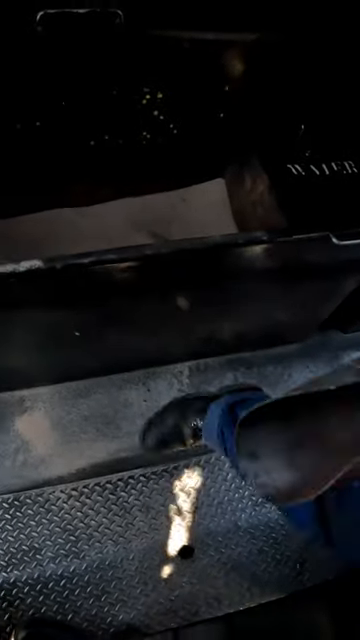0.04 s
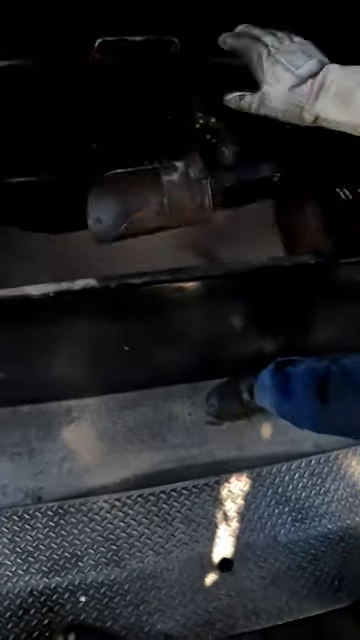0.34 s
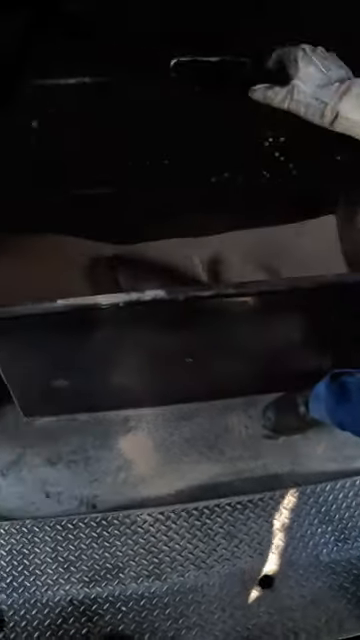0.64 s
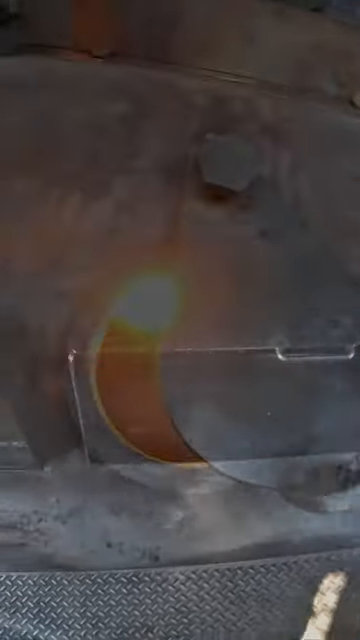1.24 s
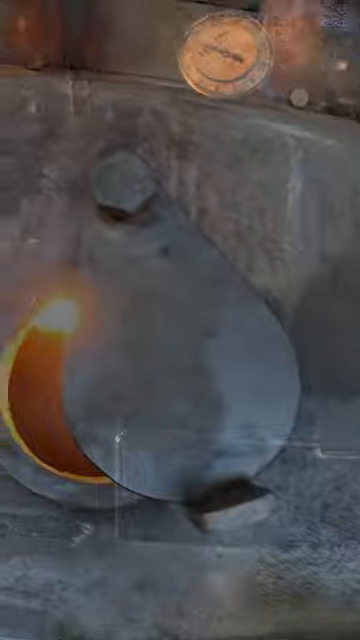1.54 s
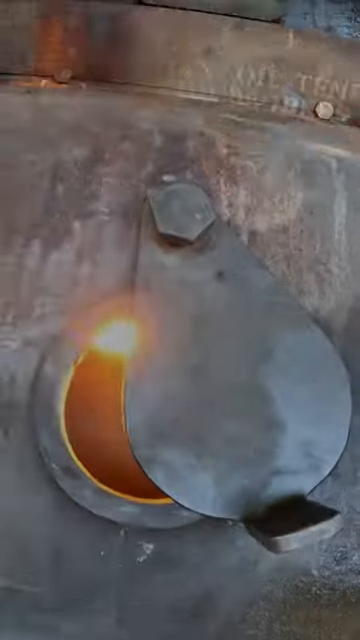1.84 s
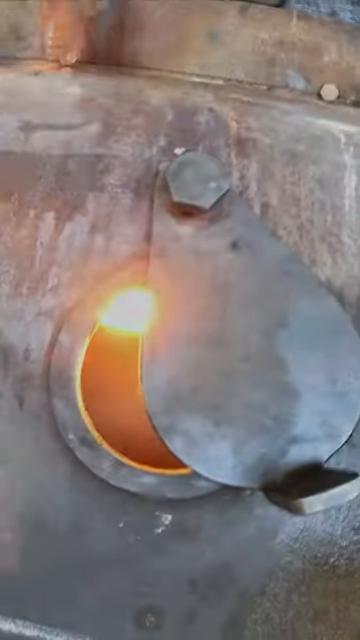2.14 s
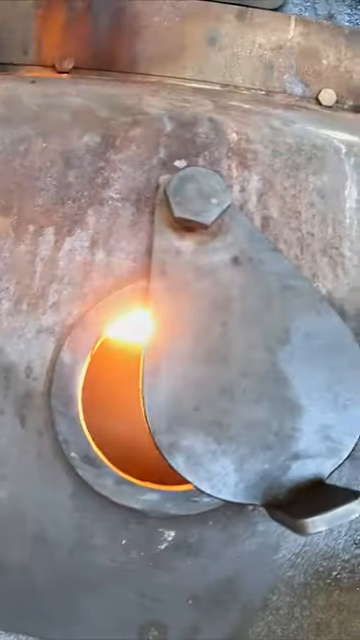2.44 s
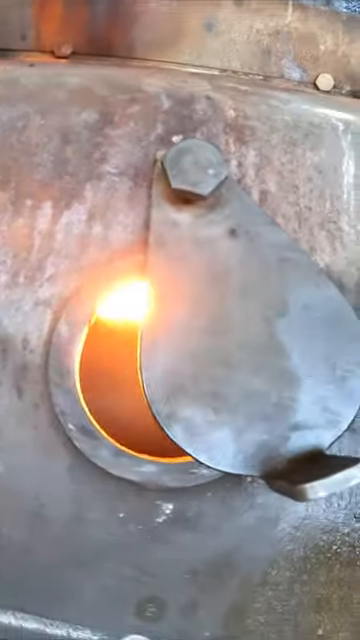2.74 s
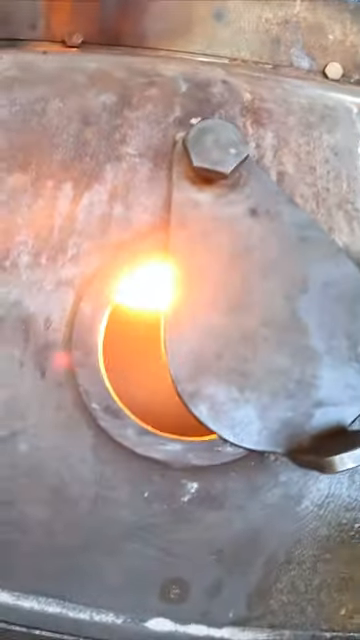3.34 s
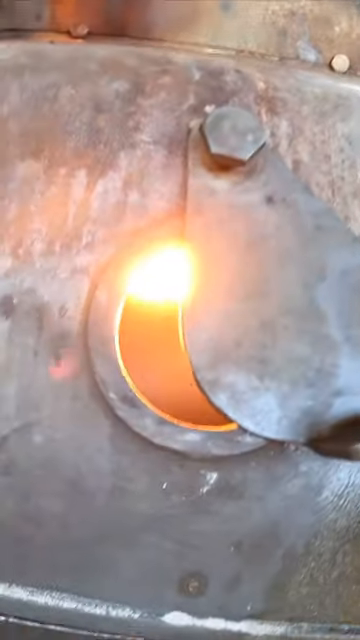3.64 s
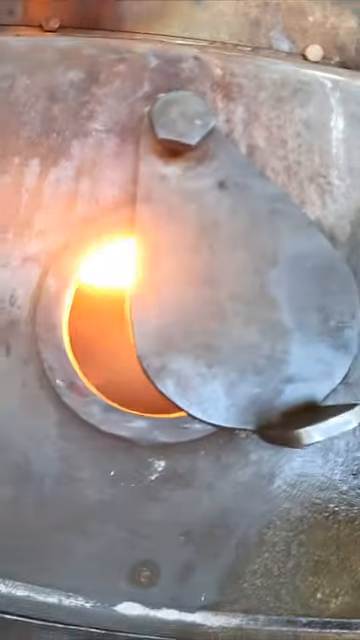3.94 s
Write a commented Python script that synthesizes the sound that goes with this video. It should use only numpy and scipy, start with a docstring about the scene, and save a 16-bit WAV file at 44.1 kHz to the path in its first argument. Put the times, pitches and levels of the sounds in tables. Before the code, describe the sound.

Heard from the cab, a working steam locomotive beats fast and hisses softly. Nearby a metal scoop clinks into a box and its lid bangs down; the chugging then fades into a low, throbbing roar at the fire door.

```python
"""Exhaust beats, eight a second, sound over a boiler drone and hissing steam in a steam locomotive's cab.
Each beat is a burst of turbulent noise. A scoop drops into a steel box and the lid clanks shut:
the blows excite the modes of the steel, and the cab walls reflect them. The sound then fades over
to the half-open fire door, where the fire rumbles and the resonant firebox booms with each pull
of the draught."""
import sys
import numpy as np
from scipy import signal
from scipy.io import wavfile

SR = 44100
rng = np.random.default_rng(int(sys.argv[2]) if len(sys.argv) > 2 else 0)


def transcribe(signal):
    """Save signal, clipped to [-1, 1], as a 16-bit WAV file at the path in sys.argv[1]."""
    frames = np.atleast_2d(signal).T
    limited = np.clip(frames, -1, 1)
    pcm = np.round(limited * 32767).astype(np.int16)
    wavfile.write(sys.argv[1], SR, pcm)


N = 176400
TIME = np.arange(N) / SR
BINS = np.fft.rfftfreq(N, 1 / SR)

# how much of each place is heard, and the level dips briefly just after the lid's first blow: time_s, gain_db
FOOTPLATE_FADE = [(0, -0.5), (.08, -1), (.6, -0.5), (.98, -1), (1.04, -12), (1.1, -10.5), (1.15, -5.5),
                  (1.35, -7), (1.75, -7), (2.1, -9), (2.5, -13), (4, -59)]
FIRE_FADE = [(0, -60), (.7, -26), (1.05, -11.5), (1.25, -7), (1.5, -3), (1.9, -2.5), (2.3, -2), (2.7, 1.5),
             (4, -1)]
# spectral shapes of the noise sources: frequency_hz, relative_density_db
CAB_SPECTRUM = [(8, -13), (20, 12), (40, 6.5), (65, -2), (100, -2.5), (160, 2.5), (250, 2.5), (340, -13),
                (450, -6.5), (650, -15.5), (1500, -22), (3000, -40.5), (15000, -66.5)]
STEAM_SPECTRUM = [(500, -9), (1500, 6), (2500, -1), (4000, -2.5), (5600, -5), (6800, -9.5), (7800, -10),
                  (8700, -20), (10500, -16), (12100, -15.5), (13000, -22.5), (14100, -23), (15400, -41)]
EXHAUST_SPECTRUM = [(100, -16), (230, 9.5), (320, 8), (420, -6), (520, 2.5), (700, -6), (850, -6.5),
                    (970, -6), (1500, -11), (2200, -16.5), (5000, -21.5), (9000, -33.5), (15000, -47)]
CLATTER_SPECTRUM = [(200, -20), (700, -5), (1300, 5), (2200, 1.5), (3400, -0.5), (5300, -3.5), (6500, -7),
                    (7800, -12), (8700, -21.5), (10500, -19), (12500, -37), (15500, -36)]
DRAUGHT_SPECTRUM = [(200, 5), (500, -4), (750, 0), (1100, 0), (1700, -1.5), (2200, -9.5), (3400, -10.5),
                    (5000, -19.5), (7200, -24), (8500, -33.5), (12000, -36.5), (13000, -40), (14400, -44),
                    (15200, -59)]
ROAR_SPECTRUM = [(40, -1.5), (70, -17), (105, 4), (150, 0.5), (205, 3.5), (260, -2), (370, 3.5),
                 (470, -3.5), (550, -10.5), (750, -14), (1100, -19.5), (1700, -22.5), (2300, -27.5),
                 (4000, -33.5), (7300, -43.5), (8600, -54.5), (12000, -58.5), (13000, -63.5), (14400, -57),
                 (15200, -74)]
FLARE_SPECTRUM = [(300, -19), (550, 6), (750, -0.5), (1050, -2.5), (1600, -14.5), (2400, -29.5),
                  (6000, -52.5)]
RUMBLE_SPECTRUM = [(6, -38), (14, 0.5), (20, -4.5), (31, 0), (42, -6), (60, -17.5), (100, -35.5),
                   (300, -83.5)]
# envelopes of the hiss, the carried scoop, the flaring flames and their rumble: time_s, gain_db
STEAM_SWELL = [(0, -1.5), (.21, 3), (.3, -0.5), (.36, 4), (.48, -1), (.68, 1.5), (.82, -5.5), (.87, 0.5),
               (.93, 0), (1.2, 0), (1.4, -1.5), (4, -14)]
SCOOP_RING_SWELL = [(0, -5), (.03, -11.5), (.07, -11), (.11, -21), (.16, -18), (.19, -14), (.22, -13),
                    (.32, -34), (.37, -25), (.42, -2), (.48, -20), (.555, -17), (.62, -25), (.8, -60.5)]
FLARE_SWELL = [(0, -60), (2.4, -41), (2.52, -34.5), (2.68, -40), (2.76, -33.5), (2.88, -41), (3.05, -42),
               (3.125, -32), (3.17, -46), (3.22, -33), (3.37, -32), (3.44, -38.5), (3.56, -45.5),
               (3.8, -39.5), (4, -36)]
RUMBLE_SWELL = [(0, 15), (1.7, -3), (2.0, 1), (2.6, 4), (2.95, 2), (3.1, -7), (3.3, 3), (3.7, 0), (4, 4)]
# resonances of cab plates, carried scoop, steam leaks and firebox air: pitch_hz, width_hz, level_db
PLATE_MODES = [(305, 22, -34), (490, 22, -41), (533, 20, -39), (570, 24, -42), (694, 18, -41),
               (759, 22, -43), (953, 26, -43), (5539, 90, -56), (7833, 90, -61)]
SCOOP_RING = (2794, 13, -27.5)
LEAK_WHISTLES = [(10020, 160, -77), (13680, 140, -86)]
FIREBOX_MODES = [(82.7, 11, -33), (155.2, 23.5, -32.5), (233.8, 13, -29.5), (263.8, 15, -27.5),
                 (293, 13, -32), (335.3, 15.5, -25.5), (409.4, 18, -28.5), (454.5, 18, -32)]
# course of the boiler's note: time_s, pitch_hz, level_db
DRONE_PATH = [(0, 189.3, -29), (.055, 175.4, -16.5), (.095, 178.5, -33), (.14, 180.6, -12),
              (.21, 185.4, -25), (.265, 178.5, -13.5), (.33, 173.5, -17.5), (.415, 179.3, -23),
              (.455, 190.4, -15), (.53, 190.7, -32), (.58, 188.2, -23), (0.719, 177.1, -16),
              (.77, 183.4, -23), (.88, 179.4, -27.5), (1.08, 170.9, -31.5), (1.28, 194.3, -21.5),
              (1.34, 187.8, -28.5), (1.45, 187.6, -26), (1.9, 184.4, -33.5), (2.5, 188.3, -52)]
# exhaust beats: crest_s, level_db
EXHAUST_BEATS = [(.095, 2.5), (.215, 0.5), (.35, 1), (.475, 1.5), (.61, -18), (.735, -0.5), (.785, -2.5),
                 (.875, 0.5), (.96, -5), (1.125, -2.5), (1.25, -23), (1.38, -9), (1.5, -10), (1.63, -5),
                 (1.76, -1.5)]
# blows on steel: start_s, level_db, spot_hz, struck_db, ring_hz, ring_db, contact_damping_db_per_s
SCOOP_HITS = [(.4945, -1, 2490, 1, 4900, -1, 20), (.5735, 0, 2340, -1, 3300, -1.5, 80)]
LID_HITS = [(.9725, 0, 2200, 0, 2800, -2, 0), (1.159, -4, 5000, -3, 5100, -4, 40),
            (1.2305, -12, 3500, -3, 5300, -7, 280), (1.236, -9, 3500, -3, 5300, -7, 280),
            (1.2515, -13, 4580, -12, 5300, -6, 280), (1.272, -15, 2430, -3, 5300, -12, 350)]
# free vibrations of the steel: pitch_hz, level_db, t60_s
SCOOP_MODES = [(1195, -17, .12), (1599, -24, .15), (1770, -19, .1), (2116, -17, .1), (2390, -15.5, .13),
               (2794, -32, .4), (3542, -24.5, .16), (3731, -26, .08), (4117, -24, .13), (4312, -28, .14),
               (4903, -24, .15), (5600, -29, .07), (6949, -29, .1), (9350, -31, .1)]
LID_MODES = [(1660, -29, .26), (1800, -25, .1), (2078, -25, .18), (2186, -30, .2), (2778, -36, .4),
             (2850, -15, .035), (2916, -27.5, .7), (3200, -35, .25), (4032, -26, .15), (4582, -26, .24),
             (4905, -22.5, .28), (5306, -21, .13), (5857, -31, .2), (6761, -29, .36), (6949, -25, .18),
             (7515, -35, .22), (8769, -42, .35), (9216, -36, .2), (9593, -39, .23), (9776, -38, .35),
             (10600, -36, .3), (11605, -43, .4), (13470, -53, .3)]
# puffs of air drawn through the fire door: middle_s, length_s, level_db
DRAUGHT_PUFFS = [(1.13, .06, -8), (1.394, 0.062, 7), (1.513, 0.084, 1.5), (1.643, 0.093, 1.5),
                 (1.78, 0.083, -3), (1.905, .07, 2), (2, 0.091, -3), (2.114, .07, 0), (2.2, 0.07, 2.5),
                 (2.49, 0.082, -2), (2.61, 0.068, -1.5), (2.71, .07, -3.5), (2.825, 0.059, -1.5),
                 (2.987, 0.096, 0), (3.114, 0.074, 4), (3.224, 0.061, 4.5), (3.358, 0.096, 2.5),
                 (3.473, 0.074, 4), (3.611, 0.055, 5), (3.706, 0.064, 3), (3.868, 0.079, 4),
                 (3.955, .08, 2)]
# throbs of the firebox: crest_s, pitch_hz, level_db
FIREBOX_THROBS = [(1.13, 427.9, 3.5), (1.245, 426.1, 2), (1.385, 423.8, -3.5), (1.5, 426.1, -4),
                  (1.64, 430.7, -4.5), (1.745, 430.9, -2.5), (1.86, 427.5, 2), (1.995, 416.7, 6),
                  (2.1, 424, 1), (2.24, 426.7, 6.5), (2.338, 422.1, 9.5), (2.41, 416.8, -3),
                  (2.485, 445.5, 1.5), (2.615, 437.1, 1.5), (2.75, 440.4, 1.5), (2.87, 434.5, 4),
                  (3, 440.4, .5), (3.09, 427.1, 0.5), (3.16, 430.6, 4), (3.28, 418.8, 0.5),
                  (3.38, 423.3, -2.5), (3.515, 424.2, 4), (3.62, 432.6, 2.5), (3.76, 423.3, 8.5),
                  (3.88, 433, 5), (3.98, 423.7, -0.5)]


def amp(db):
    """Amplitude grows tenfold for every 20 dB."""
    return 10 ** (np.asarray(db) / 20)


def unit(x):
    """Normalisation to an rms of 1."""
    return x / np.sqrt(np.mean(abs(x) ** 2) + 1e-20)


def envelope(points):
    """Gain over time, interpolated in decibels."""
    return amp(np.interp(TIME, *np.transpose(points)))


def add(mix, start_s, sound):
    """Superposition: a sound adds to the mix from its start time."""
    part = mix[max(round(start_s * SR), 0):][:len(sound)]
    part += sound[:len(part)]


def shaped(gain, steady=0):
    """Spectral shaping of complex noise; steady (0 to 1) evens out its chance swells."""
    white = rng.standard_normal(len(BINS)) + 1j * rng.standard_normal(len(BINS))
    z = unit(np.fft.ifft(gain * white, N))
    return z / (abs(z) ** 2 + .1) ** (steady / 2)


def noise(spectrum, steady=0):
    """Broadband noise, its spectrum interpolated over log frequency."""
    hz, db = np.transpose(spectrum)
    gain = amp(np.interp(np.log(BINS + 1), np.log(hz), db))
    return unit(shaped(gain, steady).real)


def resonance(hz, width_hz, steady=0):
    """A randomly driven resonator passes a narrow band of noise, whose pitch may follow a curve."""
    centre = np.mean(hz)
    drift = np.exp(2j * np.pi * np.cumsum((hz - centre) * np.ones(N)) / SR)
    band = 1 / np.sqrt(1 + ((BINS - centre) / (width_hz / 2)) ** 4)
    return unit((drift * shaped(band, steady)).real)


def resonances(modes):
    """Superposition of independently driven resonators."""
    return sum(amp(db) * resonance(hz, width_hz) for hz, width_hz, db in modes)


def flutter(rate_hz, depth_db):
    """Random amplitude modulation, mostly slower than rate_hz."""
    return amp(depth_db * unit(shaped(1 / (1 + (BINS / rate_hz) ** 2)).real))


def beats(crests, rise_s, fall_s):
    """Gaussian swells round each crest add in power."""
    return np.sqrt(sum(amp(db) ** 2 * np.exp(-((TIME - s) / np.where(TIME < s, rise_s, fall_s)) ** 2)
                       for s, db in crests))


def boiler_drone():
    """Narrow-band resonance: the boiler holds a hollow, wavering note."""
    s, hz, db = np.transpose(DRONE_PATH)
    return amp(np.interp(TIME, s, db)) * resonance(np.interp(TIME, s, hz), width_hz=6, steady=.95)


def cab_vibration(beat):
    """Forced vibration: the engine rings the plates, harder on each beat, over the cab's low rumble."""
    plates = resonances(PLATE_MODES) * (.77 + .25 * beat)
    return plates + amp(-18.5) * noise(CAB_SPECTRUM)


def steam_hiss():
    """Turbulence in escaping steam radiates a broadband hiss."""
    return amp(-36) * envelope(STEAM_SWELL) * noise(STEAM_SPECTRUM) * flutter(rate_hz=21, depth_db=1.06)


def exhaust(beat):
    """Pulsed flow: turbulent noise swells with each beat of the exhaust."""
    return amp(-21.5) * beat * noise(EXHAUST_SPECTRUM) * flutter(rate_hz=170, depth_db=.3)


def cab_echo(sound, t60_s=.14, echo_db=-10):
    """Reverberation: the steel walls return dense, quickly decaying reflections."""
    t = TIME[:SR // 2]
    taps = rng.standard_normal(len(t))
    taps *= (rng.random(len(t)) < 2000 / SR) & (t > .004)  # about 2000 a second, after 4 ms
    highpass = signal.butter(2, 600, "high", fs=SR, output="sos")
    tail = signal.sosfilt(highpass, taps * amp(-60 * t / t60_s))
    return sound + amp(echo_db) * signal.fftconvolve(sound, tail / np.linalg.norm(tail))[:N]


def scoop_singing():
    """Resonance: one mode of the scoop sings as it is carried."""
    hz, width_hz, db = SCOOP_RING
    note = amp(db) * resonance(hz, width_hz, steady=.49)
    return envelope(SCOOP_RING_SWELL) * note * flutter(rate_hz=14, depth_db=4)


def box_thumps(pitch_hz=162, t60_s=.3):
    """Damped oscillation: the hollow box booms under each blow of its lid."""
    out, t = np.zeros(N), TIME[:SR]
    for start_s, db, *_ in LID_HITS:
        add(out, start_s, amp(db - 13 - 60 * t / t60_s) * np.sin(2 * np.pi * pitch_hz * t))
    return out


def lid_shimmer(count=60, low_hz=5500, high_hz=13000, t60_s=.17):
    """High modal density: each blow of the lid wakes a crowd of faint upper modes."""
    out, t = np.zeros(N), TIME[:SR // 2]
    hz = rng.uniform(low_hz, high_hz, count)
    tilt = amp(-9 * np.log2(hz / low_hz))  # 9 dB weaker per octave
    partials = tilt[:, None] * np.sin(2 * np.pi * np.outer(hz, t))
    for start_s, db, *_, damping in LID_HITS:
        decay = amp(db - 37 - (60 / t60_s + damping) * t)
        add(out, start_s, decay * unit(rng.standard_normal(count) @ partials))
    return out


def clanks(hits, modes, focus_db_per_octave, crack, clatter, spot):
    """Impact excites the modes of steel; crack, clatter and struck spot each decay by (level_db, t60_s)."""
    out, t = np.zeros(N), TIME[:SR]
    attack = np.minimum(t / .0007, 1)
    crack_decay, clatter_decay, spot_decay = (amp(db - 60 * t / t60) for db, t60 in (crack, clatter, spot))
    for start_s, db, spot_hz, struck_db, ring_hz, ring_db, damping in hits:
        ring = np.zeros(len(t))
        for hz, mode_db, t60_s in modes:
            scatter, phase = rng.uniform(-1, 1, 2)
            focus_db = -focus_db_per_octave * abs(np.log2(hz / ring_hz))  # favours modes near ring_hz
            decay = amp(mode_db + ring_db + focus_db + 1.5 * scatter - (60 / t60_s + damping) * t)
            ring += decay * np.sin(2 * np.pi * hz * t + np.pi * phase)
        ping = amp(struck_db) * spot_decay * np.sin(2 * np.pi * spot_hz * t)
        rattle = noise(CLATTER_SPECTRUM)[:SR] * (crack_decay + clatter_decay)
        add(out, start_s, amp(db) * attack * (ring + ping + rattle))
    return out


def draught(squareness=3.5):
    """Flow noise: air rushes through the fire door in steep-sided puffs with lulls between."""
    power = sum(amp(db) ** 2 * np.exp(-abs(2 * (TIME - middle_s) / length_s) ** squareness)
                for middle_s, length_s, db in DRAUGHT_PUFFS)
    return amp(-38) * np.sqrt(power) * noise(DRAUGHT_SPECTRUM) * flutter(rate_hz=40, depth_db=.5)


def flames():
    """Turbulent combustion: a roar with throaty flares over a deep rumble."""
    roar = amp(-26.5) * noise(ROAR_SPECTRUM) * flutter(rate_hz=31, depth_db=1.43)
    flare = envelope(FLARE_SWELL) * noise(FLARE_SPECTRUM)
    rumble = amp(-20.5) * envelope(RUMBLE_SWELL) * noise(RUMBLE_SPECTRUM, steady=.35)
    return roar + flare + rumble


def firebox_boom(rest_db=-17):
    """Cavity resonance: the firebox throbs on one slightly shifting note; its standing waves swell too."""
    crest_s, hz, db = np.transpose(FIREBOX_THROBS)
    swell = np.hypot(beats(zip(crest_s, db), rise_s=.027, fall_s=.028), amp(rest_db))
    note = amp(-22.5) * swell * resonance(np.interp(TIME, crest_s, hz), width_hz=15, steady=.9)
    standing_waves = resonances(FIREBOX_MODES) * (.8 + .2 * np.minimum(swell, 2))
    return note + standing_waves


def scene():
    """Superposition: the footplate fades over to the fire door, with the scoop and lid close by."""
    scoop = clanks(SCOOP_HITS, SCOOP_MODES, focus_db_per_octave=12,
                   crack=(-20.5, .083), clatter=(-32, .079), spot=(-19.5, .082))
    lid = clanks(LID_HITS, LID_MODES, focus_db_per_octave=5,
                 crack=(-17.5, .033), clatter=(-28.5, .32), spot=(-11, .024))
    singing = scoop_singing()
    beat = beats(EXHAUST_BEATS, rise_s=.03, fall_s=.035)
    footplate = envelope(FOOTPLATE_FADE) * (exhaust(beat) + steam_hiss() + cab_vibration(beat))
    drone = boiler_drone()
    fire = envelope(FIRE_FADE) * (draught() + flames() + firebox_boom() + resonances(LEAK_WHISTLES))
    steel = singing + box_thumps() + cab_echo(scoop + lid + lid_shimmer())
    return (drone + footplate + steel + fire)[None]


def record(dry, ceiling=.62, cutoff_hz=15450):
    """Soft saturation rounds the highest peaks; a low-pass filter then limits the band."""
    rounded = dry / (1 + (dry / ceiling) ** 8) ** (1 / 8)
    lowpass = signal.firwin(255, cutoff_hz, window=("kaiser", 9), fs=SR)
    return signal.oaconvolve(rounded, lowpass[None], "same")


dry = scene()
out = record(dry)
transcribe(out)
```